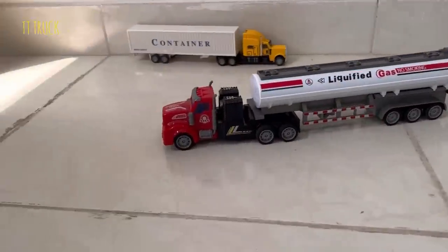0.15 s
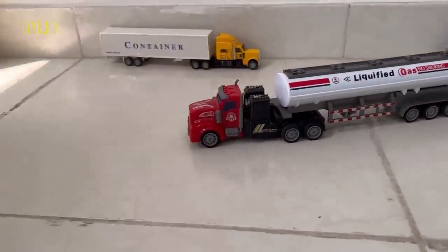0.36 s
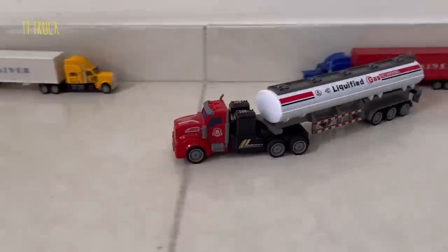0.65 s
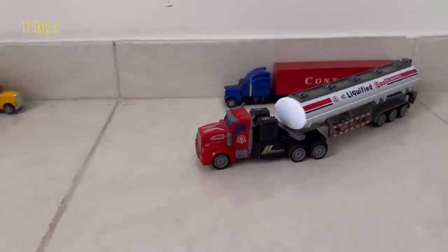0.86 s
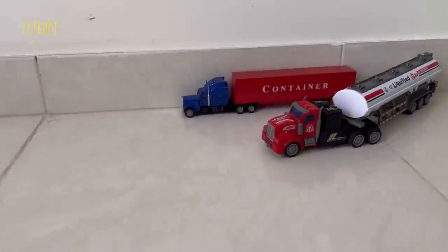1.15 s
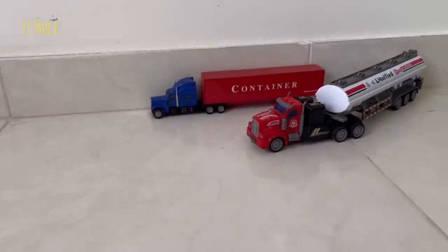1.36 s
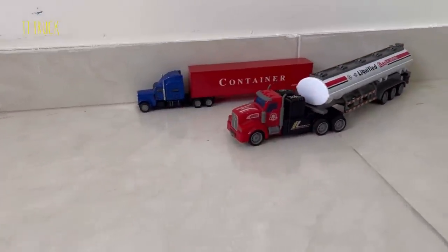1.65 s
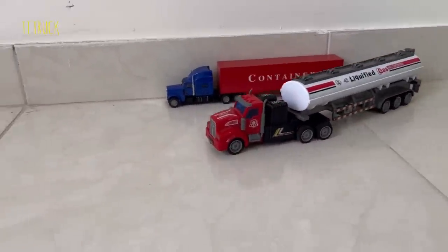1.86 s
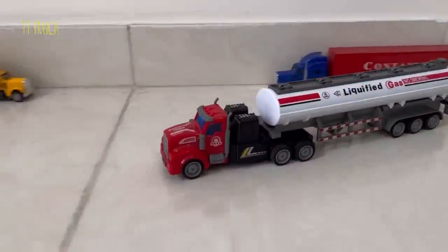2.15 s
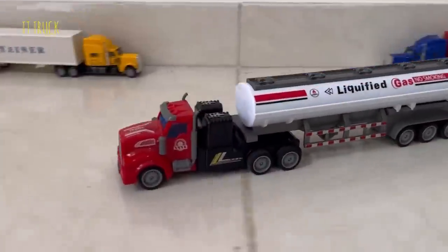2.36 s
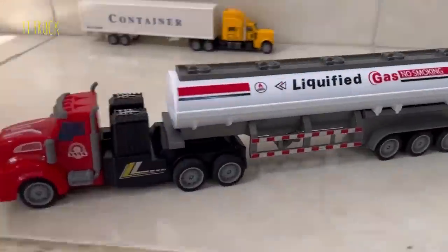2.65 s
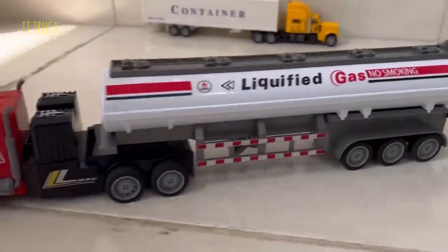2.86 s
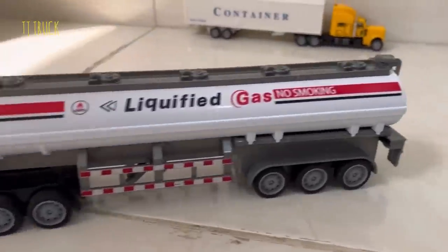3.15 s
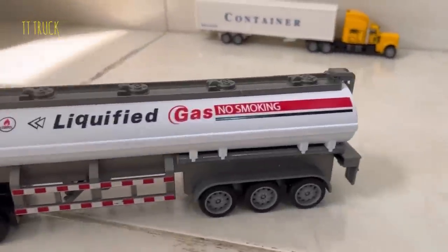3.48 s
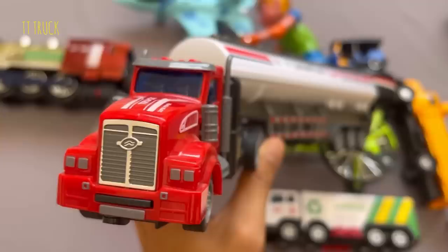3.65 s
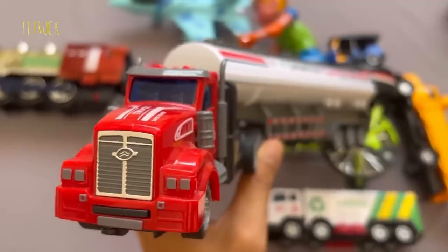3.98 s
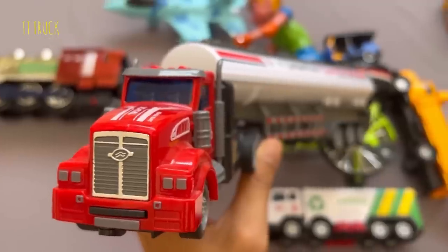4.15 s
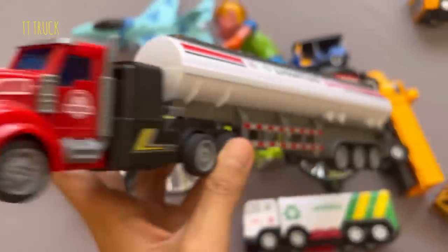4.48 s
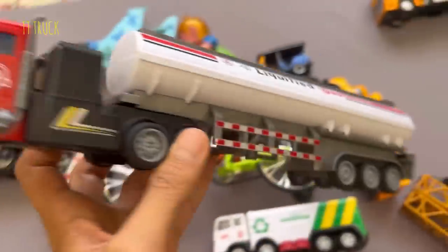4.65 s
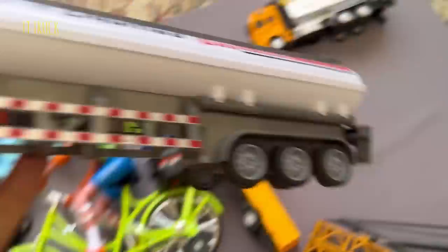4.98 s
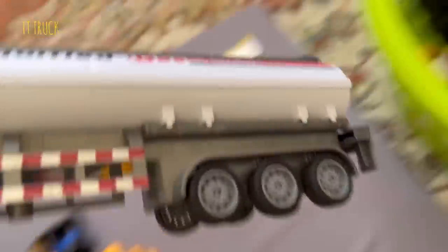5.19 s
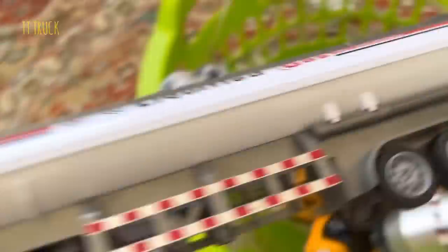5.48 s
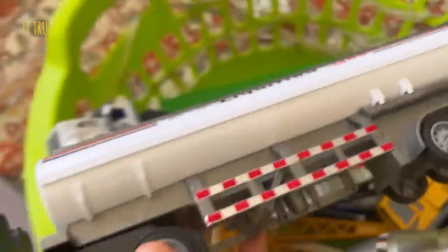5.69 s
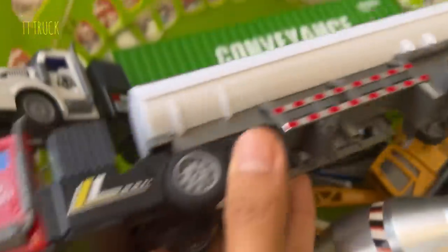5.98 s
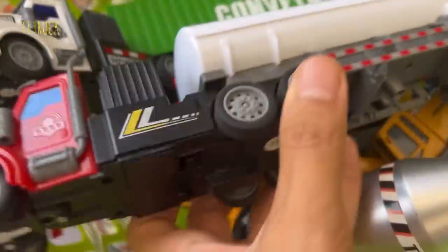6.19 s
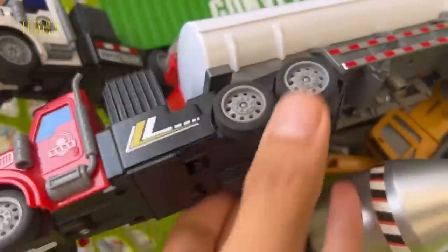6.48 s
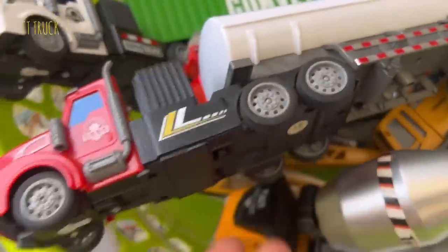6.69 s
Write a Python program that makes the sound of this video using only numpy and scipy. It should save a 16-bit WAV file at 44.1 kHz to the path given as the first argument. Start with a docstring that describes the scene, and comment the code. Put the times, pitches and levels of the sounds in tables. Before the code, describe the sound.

Plastic toy truck wheels roll and rattle back and forth over tiles, then the toy clicks and creaks as a hand turns it.

```python
"""Plastic wheels grind over tiles as a toy lorry rolls back and forth: its hollow tank rattles over the joints,
its gears rasp, and they whine as it speeds up. Then the scene changes: the toy is turned in a hand and ticks,
creaks and snaps. Contact forces excite the resonances of tank, chassis and thin edges. A small hard room
reverberates over a faint rumble, with a hum during the rolling; two microphone ports receive the toy at
different phases."""
import sys
import numpy as np
from scipy import signal
from scipy.fft import rfft, irfft, next_fast_len
from scipy.io import wavfile
from scipy.ndimage import map_coordinates

SR = 44100
rng = np.random.default_rng(int(sys.argv[2]) if len(sys.argv) > 2 else 0)


def dump(signal):
    """Clip the signal to [-1, 1] and save it as 16-bit WAV at the path in sys.argv[1]."""
    limited = np.clip(np.atleast_2d(signal).T, -1, 1)
    pcm = np.round(limited * 32767).astype(np.int16)
    wavfile.write(sys.argv[1], SR, pcm)


N = 301181
FLOOR_END_S, HAND_START_S = 3.645, 3.672

# Wheels roll back and forth; a hand rubs faintly on the plastic; later a thumb spins a wheel.
# Each row: time in seconds, rumble in dB, hiss over rumble in dB.
ROLLING = [
    [(0.0, -47, -30), (0.062, -60.5, -21.5), (0.1, -58, -17), (0.15, -50, -10), (0.26, -44, -10.5),
     (0.72, -36, -7), (0.78, -29.5, -8), (1.03, -32, -7.5), (1.09, -33.5, -7), (1.17, -33, -12),
     (1.22, -38.5, -8.5), (1.3, -52, -14), (1.5, -76, -7.5)],
    [(1.6, -55, -17), (1.73, -49.5, -10), (2.03, -41, -7), (2.28, -40.5, -5), (2.46, -37, -6),
     (2.98, -43.5, -8.5), (3.16, -51.5, -8), (3.22, -53.5, -9), (3.42, -72.5, -7), (3.6, -76.5, -7)],
    [(3.7, -70, -12.5), (3.85, -72, -11.5), (4.0, -81.5, -3.5), (4.15, -77.5, -0.5), (5.97, -80, -4),
     (6.06, -54.5, -5), (6.14, -60, -5), (6.2, -40.5, -19), (6.3, -41, -6.5), (6.4, -65.5, -7),
     (6.47, -64, -8), (6.6, -81.5, -3)],
]
# Broad radiation spectrum of the chassis. Each row: frequency in Hz, level in dB.
CHASSIS_SPECTRUM = [(1000, -43), (2200, -3), (2700, -7.5), (3300, -4), (4000, -2), (5300, -3.5), (6300, -6),
                    (7600, -5.5), (9000, -9), (14000, -51)]


def amp(db):
    return 10 ** (np.asarray(db) / 20)


def unit(x):
    return x / np.sqrt(np.mean(x ** 2) + 1e-20)


def along(points, hz):
    """Interpolation of (Hz, value) points on a logarithmic frequency axis."""
    f, v = np.transpose(points)
    return np.interp(np.log(hz + 1), np.log(f + 1), v)


def curves(rows):
    """Linear interpolation, sample by sample, of each column after the time."""
    s, *cols = np.transpose(rows)
    return [np.interp(np.arange(N) / SR, s, c) for c in cols]


def wobble(rate):
    """Smooth random modulation with rate knots a second."""
    return map_coordinates(rng.standard_normal(int(N * rate / SR) + 4), [np.arange(N) * rate / SR])


def filtered(x, response):
    """Linear filtering by a complex frequency response."""
    m = next_fast_len(N + SR // 2)
    return irfft(rfft(x, m) * response(np.fft.rfftfreq(m, 1 / SR)), m)[..., :N]


def resonator(x, hz, width):
    """A second-order resonance with unit gain at its centre."""
    return signal.lfilter(*signal.iirpeak(min(hz, SR / 3), hz / width, SR), x)


def impulse_response(spectrum, modes=(), lift_db=0):
    """Minimum-phase response of unit energy: resonance peaks on a broad spectrum."""
    hz = np.fft.rfftfreq(4096, 1 / SR)
    peaks = sum(amp(db + lift_db) / np.sqrt(1 + (2 * (hz - c) / w) ** 2) for c, w, db in modes)
    cepstrum = irfft(np.log(amp(along(spectrum, hz)) * (1 + peaks) + 1e-6))
    cepstrum[1:2048] *= 2
    cepstrum[2049:] = 0
    response = irfft(np.exp(rfft(cepstrum)))[:2048]
    return response / np.linalg.norm(response)


def radiate(forces):
    """Forced vibration: tank, chassis and thin edges each filter the force acting on them."""
    # Broad radiation spectra. Each row: frequency in Hz, level in dB.
    tank_spectrum = [(150, -35), (300, -8.5), (450, -8.5), (700, -4), (1000, -5), (1600, -3.5), (2500, -6),
                     (3300, -11.5), (4500, -24), (9000, -55.5)]
    edge_spectrum = [(4000, -36), (7500, -3.5), (10000, -4), (11500, 7.5), (14200, -2), (15300, -5),
                     (16600, -13.5)]
    # Resonances. Each row: frequency in Hz, bandwidth in Hz, relative height in dB.
    tank_modes = [(440, 70, -2.5), (652, 110, 3), (903, 110, 4), (1090, 83, -2.5), (1387, 85, 3.5),
                  (2320, 180, -9)]
    chassis_modes = [(4674, 200, -3.5), (2920, 210, -4.5), (8740, 600, -5)]
    parts = (impulse_response(tank_spectrum, tank_modes, lift_db=-6.5),
             impulse_response(CHASSIS_SPECTRUM, chassis_modes),
             impulse_response(edge_spectrum))
    return sum(signal.fftconvolve(force, part)[:N] for force, part in zip(forces, parts))


def grit(rate, spread_db, smooth):
    """Shot noise: random contacts of uneven size on a bed of white noise."""
    hit = rng.random(N) < rate / SR
    sizes = amp(spread_db * np.minimum(rng.exponential(size=N), 3.5)) * rng.standard_normal(N)
    return unit(unit(hit * sizes) + smooth * rng.standard_normal(N))


def rim_pressure(per_turn=1):
    """Periodic loading: an uneven wheel's pressure swings from -1 to 1 as the toy coasts out."""
    # Each entry: time in seconds of the pressure drop that comes once a turn.
    lifts = [2.64, 2.68, 2.72, 2.762, 2.817, 2.88, 2.935, 3.007, 3.068, 3.14, 3.195, 3.245, 3.3]
    t = np.arange(N) / SR
    turns = np.interp(t, lifts, np.arange(len(lifts)))
    return -np.cos(2 * np.pi * per_turn * turns) * (t > lifts[0]) * (t < lifts[-1])


def wheels_and_rubbing():
    """Roughness excitation: wheels cross grit or a hand rubs the plastic; all three forces throb alike."""
    rumble_db, hiss_db = curves(np.vstack(ROLLING))
    throb = amp(rumble_db + 2.8 * rim_pressure() + 1.7 * wobble(50) + 1.3 * wobble(13))
    contact = [grit(rate=2500, spread_db=0.5, smooth=0.3) for _ in range(3)]
    return throb * contact * amp(np.outer([0, 1, 2.2], hiss_db))


def air(spectrum):
    """Partly coherent stereo noise of unit rms, nearly mono in the bass."""
    # Each row: frequency in Hz, correlation of left and right.
    correlation = [(60, 0.93), (180, 0.91), (550, 0.71), (1650, 0.2), (4970, 0.61), (7500, .3), (9500, -.7),
                   (15000, -.3)]

    def mid_and_side(hz):
        angle = np.arccos(np.clip(along(correlation, hz), -1, 1)) / 2
        return amp(along(spectrum, hz)) * [np.cos(angle), np.sin(angle)]

    mid, side = filtered(rng.standard_normal((2, N)), mid_and_side)
    return unit(np.array([mid + side, mid - side]))


def hum():
    """Amplitude and phase modulation make the low tones of a distant machine waver."""
    # Each row: frequency in Hz, level in dB, rate of wavering in Hz.
    tones = [(115.6, -49.5, 5.4), (76, -60, 10)]
    t = np.arange(N) / SR
    return sum(amp(db + 1.2 * wobble(rate)) * np.sin(2 * np.pi * hz * t + 1.4 * wobble(rate))
               for hz, db, rate in tones)


def background():
    """Ambient noise: one spectrum with hum for the floor, another for the hand."""
    # Each row: frequency in Hz, relative spectral density in dB.
    floor_spectrum = [(24, -32), (40, -4.5), (118, -7), (140, -7.5), (215, -14), (363, -20.5), (770, -30.5),
                      (1040, -52.5), (1810, -40), (3300, -60.5), (6650, -53), (9450, -79.5), (16000, -62.5)]
    hand_spectrum = [(24, -49), (40, -2), (77, 1), (99, -11), (130, -1.5), (159, -12), (194, -9),
                     (220, -18), (329, -18), (542, -29.5), (1040, -34.5), (1590, -37.5), (2300, -52),
                     (3300, -39.5), (5800, -57), (6800, -56), (7500, -45), (8400, -70), (16000, -67.5)]
    t = np.arange(N) / SR
    fade_out = np.clip((FLOOR_END_S - t) / 0.004, 0, 1)
    fade_in = np.clip((t - HAND_START_S) / 0.013, 0, 1)
    floor = amp(-51) * air(floor_spectrum) + hum()
    hand = amp(-53.5) * air(hand_spectrum)
    return fade_out * floor + fade_in * hand


def knocks(rows, decay_ms, rise, faster, focus):
    """Impact excitation: each knock is a decaying burst of force on tank, chassis and thin edges."""
    forces, t = np.zeros((3, N + SR)), np.arange(SR // 10) / SR
    decay_s = decay_ms / 1000 / faster ** np.arange(3)[:, None]
    shape = np.exp(-t / decay_s) * (1 - np.exp(-t / (rise * decay_s)))
    for s, db, body_hz, bright_db, fizz_db in rows:
        burst = shape * rng.standard_normal((3, len(t)))
        struck = int(body_hz > 3500)  # high knocks ring the chassis, the others the tank
        ring = resonator(burst[struck], body_hz, 0.16 * body_hz)
        burst[struck] += focus * ring * np.linalg.norm(burst[struck]) / np.linalg.norm(ring)
        burst /= np.sqrt(np.sum(burst ** 2, 1) / np.sum(shape ** 2, 1))[:, None]
        levels = db + np.array([[0], [bright_db], [fizz_db]])
        forces[:, round(s * SR):][:, :len(t)] += amp(levels) * burst
    return forces[:, :N]


def rattles(count=70):
    """Random impacts of the tank, as rows for jolts; their strength follows the rumble."""
    s = rng.random(count) * FLOOR_END_S
    level, pitch, brightness = rng.standard_normal((count, 3)).T
    when, rumble_db, _ = np.vstack(ROLLING).T
    db = np.interp(s, when, rumble_db) + 10.5 + 3.5 * level
    return np.transpose([s, db, 1050 * np.exp(0.2 * pitch), -11.5 + 1.5 * brightness])


def jolts():
    """Impacts at tile joints and in the hand: the brighter one is, the more the thin edges fizz."""
    # Each row: start in seconds, force level in dB, pitch in Hz, chassis over tank in dB.
    hard_jolts = [(0.002, -31.5, 720, -24), (0.019, -36, 710, -32.5), (0.224, -29.5, 1160, -6),
                  (0.254, -29.5, 680, -19.5), (0.492, -27, 1314, -5.5), (0.513, -26, 835.4, 1),
                  (0.546, -11.5, 676, -7.5), (0.651, -19.5, 921, -6.5), (0.758, -3.5, 516, -6.5),
                  (0.766, -1, 570.5, -9), (0.782, -12.5, 788, 4.5), (0.787, -6.5, 940, -12),
                  (0.807, -1, 1425, -7), (0.821, -11.5, 1362, -3.5), (0.832, -17, 1297, -8),
                  (0.862, -12.5, 945.6, -2.5), (0.895, -9.5, 1106, -5), (0.899, -4, 933, -6),
                  (0.91, -6, 1333, -8.5), (0.925, -6.5, 834, -6), (0.94, -12, 994, -8),
                  (0.947, -9, 1416, -0.5), (0.981, -18, 898, -9), (1.011, -15, 911, -9),
                  (1.038, -14, 1524, 3), (1.044, -14.5, 744, -7.5), (1.055, -15.5, 597, -5),
                  (1.072, -16.5, 973, -10), (1.153, -18, 903, -12), (1.162, -16, 802.5, -15.5),
                  (1.188, -19.5, 2323, -15.5), (1.262, -25, 1067, -19.5), (1.556, -32.5, 2047, 1),
                  (1.989, -25.5, 1235, -8.5), (2.089, -37.5, 1460, 5), (2.174, -27, 1540, -2),
                  (2.238, -22.5, 875, -8.5), (2.274, -20.5, 755, -4), (2.281, -23, 905.5, -12.5),
                  (2.316, -18, 1037, -33), (2.334, -15.5, 1399, -7.5), (2.352, -16.5, 1267, -32),
                  (2.381, -20.5, 1210, -12), (2.426, -18, 1427, -7.5), (2.491, -22, 681, -22),
                  (2.552, -19.5, 848, -13.5), (2.563, -17.5, 1485, -13), (2.582, -13.5, 1438, -9.5),
                  (2.619, -20.5, 1069, -9), (2.689, -25.5, 1500, -0.5), (2.78, -29.5, 1200, -5),
                  (3.048, -30.5, 625, -10.5), (3.257, -40.5, 1375, -5), (4.184, -39, 1400, 4),
                  (4.804, -45, 614.7, -17), (5.538, -46, 617, -13), (6.024, -27, 1397, -9.5),
                  (6.034, -15.5, 1740, -2), (6.038, -11.5, 1500, -3.5), (6.042, -16, 868, -20.5),
                  (6.157, -17.5, 865, -13.5), (6.21, -27, 766, -2.5), (6.261, -20.5, 919, -16.5),
                  (6.274, -19, 616, -19)]
    rows = np.vstack([hard_jolts, rattles()])
    fizz_db = rows[:, 3] - 6.5
    return knocks(np.column_stack([rows, fizz_db]), decay_ms=3.04, rise=0.59, faster=1.06, focus=0.22)


def gear_rasp():
    """Gear rattle excites the modes of the case; as the gears slow, single ticks stand out."""
    # A slack gear. Each row: time in seconds, ticks per second, their share of the chatter from 0 to 1.
    ticking = [(0, 32, 0.2), (1.7, 36, 0.2), (2.3, 41, 0.2), (2.75, 175, 0.7), (3.09, 160, 0.85),
               (3.16, 95, 0.9), (3.22, 110, .9), (3.27, 56, .9), (3.4, 40, 0.9)]
    # Modes of the case. Each row: frequency in Hz, bandwidth in Hz.
    case_modes = [(4250, 600), (5050, 380)]
    # Each row: time in seconds, level over the rumble in dB, upper mode over lower in dB.
    balance = [(0.09, -33, -4), (0.15, -8, -8.5), (1.2, -32.5, -5), (1.72, -12, 5), (1.93, -6, 1.5),
               (2.25, -7, 4), (2.45, -37, 11), (2.68, -14.5, -4), (2.85, -10.5, -7), (3.05, -11.5, -10),
               (3.17, -8, -12), (3.2, -15.5, -11), (3.28, -7, -12), (3.45, -24.5, -8), (3.6, -90, -3)]
    rate, share = curves(ticking)
    passed = np.floor(np.cumsum(rate * (1 + 0.06 * wobble(18))) / SR)
    ticks = np.diff(passed, prepend=0) * np.sqrt(SR / rate) * amp(1.5 * rng.standard_normal(N))
    pressure = amp(4 * rim_pressure() + 4 * rim_pressure(per_turn=2) + 1.5 * wobble(40))
    ticks *= pressure * share
    chatter = ticks + pressure * (1 - share) * grit(rate=2100, spread_db=2, smooth=0.4)
    lower, upper = [unit(resonator(resonator(chatter, hz, 1.5 * width), hz, 1.5 * width))
                    for hz, width in case_modes]
    snap = signal.fftconvolve(ticks, impulse_response(CHASSIS_SPECTRUM))[:N]
    tank_knock = unit(resonator(ticks, hz=2450, width=600)) * share
    over_db, tilt_db = curves(balance)
    rumble_db = curves(np.vstack(ROLLING))[0]
    case = amp(-tilt_db / 2) * lower + amp(tilt_db / 2) * upper
    return amp(rumble_db + over_db) * (case + amp(-9.5) * snap + amp(-0.5) * tank_knock)


def thuds():
    """Heavily damped oscillation: a bump gives a few low cycles."""
    # Each row: start in seconds, relative level in dB, frequency in Hz.
    bumps = [(0.55, -34.5, 199.8), (0.771, -21, 415), (0.788, -24.5, 466), (0.814, -17, 440),
             (0.91, -16, 444), (0.93, -18.5, 479), (0.901, -35.5, 202.2), (2.335, -35, 211),
             (2.409, -35.5, 168), (2.552, -40.5, 195.1), (2.587, -43, 170), (4.469, -46, 205),
             (5.08, -54, 355), (6.037, -34.5, 206), (6.16, -41.5, 238.5), (6.259, -38.5, 81),
             (6.275, -37, 160)]
    out, t = np.zeros(N + SR), np.arange(SR // 10) / SR
    for s, db, hz in bumps:
        out[round(s * SR):][:len(t)] += amp(db) * np.sin(2 * np.pi * hz * t) * np.exp(-hz * t / 2.4)
    return out[:N]


def snaps():
    """A single hard contact is nearly an impulse, so its spectrum is broad."""
    # Each row: start in seconds, force level in dB, pitch in Hz, chassis and edges over tank in dB.
    contacts = [(0.7665, -6, 900, -6, -16.5), (0.7875, -7, 900, -6.5, -16), (0.862, -12.5, 1000, -2, -12.5),
                (1.5863, -25.5, 890, 11, 25), (1.6614, -36.5, 909, 9, 14.5), (1.7047, -36.5, 870, 8, 14),
                (2.337, -18.5, 1400, -8, -13), (2.392, -15.5, 3930, 2.5, -4), (2.412, -8, 2400, -5, -9),
                (2.584, -17, 1440, -2, -13.5)]
    return knocks(contacts, decay_ms=0.35, rise=0.13, faster=2.1, focus=0.44)


def pings(rise_ms=0.37):
    """Free vibration: a small hollow part, once struck, rings with one short clear note."""
    # Each row: start in seconds, level in dB, frequency in Hz, time to fall 60 dB in seconds.
    notes = [(0.809, -16, 1407, 0.033), (0.862, -17, 3000, 0.017), (0.909, -16, 4548, 0.034),
             (1.542, -25.5, 5860, .014), (1.555, -34, 3275, .03), (1.588, -29.5, 2310, .02),
             (4.185, -45.5, 3870, 0.023), (4.436, -26.5, 2073, 0.035), (4.44, -32, 1350, 0.036),
             (4.453, -44.5, 1702, 0.044), (5.243, -45, 2120, .02), (6.037, -16, 3002, .015),
             (6.042, -19, 856, 0.036), (6.2482, -6, 3000, 0.0099), (6.2488, -5.5, 4707, .014)]
    out, t = np.zeros(N + SR), np.arange(SR // 10) / SR
    swell = 1 - np.exp(-1000 * t / rise_ms)
    for s, db, hz, t60 in notes:
        tone = np.sin(2 * np.pi * hz * t + rng.uniform(0, 2 * np.pi))
        out[round(s * SR):][:len(t)] += amp(db - 60 * t / t60) * swell * tone
    return out[:N]


def creaks():
    """Soft pushes build force more slowly and drive a resonance of the plastic."""
    # Each row: start in seconds, force level in dB, pitch in Hz, chassis and edges over tank in dB.
    pushes = [(1.105, -22, 2280, -17, -25), (1.175, -21.5, 2300, -7, -12),
              (1.203, -22.5, 2345, -14.5, -25.5), (4.186, -45, 2120, -7, -22), (4.237, -51, 1003, -5, -20),
              (4.64, -51.5, 1400, -9, -31), (4.652, -48, 1390, -17, -30.5), (5.002, -45, 719, -14, -30.5),
              (5.012, -61, 1350, -20, -30), (5.768, -51, 1097, -22, -29), (5.824, -38, 682, -23, -18.5),
              (6.437, -46, 1103, -12, -26), (6.262, -31, 920, 8, -15.5)]
    return knocks(pushes, decay_ms=6.7, rise=0.69, faster=0.99, focus=0.63)


def clicks():
    """Brief impacts of loose plastic parts, whose treble dies first."""
    # Each row: start in seconds, force level in dB, pitch in Hz, chassis and edges over tank in dB.
    contacts = [(1.497, -48, 1967, -8, -24.5), (1.542, -27, 835, 7, 0.5), (1.681, -35.5, 2260, -14, -11.5),
                (2.548, -17, 1040, -7.5, -12), (4.29, -53.5, 2300, -4, -25),
                (4.348, -54.5, 1380, -23, -25.5), (4.435, -28.5, 2070, 2.5, -4.5),
                (4.439, -29.5, 2000, -10, -20), (4.39, -62, 2500, -4.5, -15), (4.445, -30, 1720, -10, -19),
                (4.454, -33.5, 1700, -1, -26), (4.695, -65.5, 4800, 8.5, -14.5),
                (4.745, -41.5, 1810, -11, -30), (4.769, -44, 602, -8, -29),
                (4.998, -39.5, 1295, -13.5, -25), (5.243, -41, 2120, -4.5, -14),
                (5.285, -56, 500, -28, -23), (5.791, -31.5, 1080, -16, -36), (5.796, -30, 1030, -16.5, -35),
                (5.84, -39.5, 1110, -23, -29.5), (5.845, -42, 1010, 9, -1), (5.981, -45, 599, 9, -5),
                (5.998, -44.5, 700, -8.5, -18), (6.017, -26, 1474, 4, -5), (6.151, -31, 1027, -8, -20),
                (6.189, -36.5, 1110, 5.5, -7), (6.222, -33, 900, -9, -7.5), (6.233, -28, 813, -11.5, -19),
                (6.24, -27.5, 796.5, -11, -24), (6.2485, -12.5, 2930, -2, 3), (6.252, -18.5, 963, 0.5, -9),
                (6.412, -44, 1852, 5.5, -19), (6.431, -30, 1110, -3.5, -26.5),
                (6.444, -38.5, 1300, -2, -19.5), (6.498, -50, 1070, -12.5, -25),
                (6.557, -55.5, 520, 4.5, 2.5), (6.73, -55, 1518, -19.5, -32)]
    return knocks(contacts, decay_ms=1.45, rise=0.13, faster=1.5, focus=0.32)


def gear_whine(start_hz=450, limit_hz=1300, climb_s=0.75):
    """Meshing teeth sound harmonics of the tooth-passing frequency, which climbs with the speed."""
    # Each row: harmonic number, relative level in dB.
    harmonics = [(1, -20), (2, -5.5), (3, -10), (4, -18)]
    start_s, loudest_s, stop_s = 1.8, 1.9, 2.3
    t = np.arange(N) / SR
    hz = limit_hz - (limit_hz - start_hz) * np.exp(-np.maximum(t - start_s, 0) / climb_s)
    db = np.interp(t, [start_s - 0.15, start_s, loudest_s, stop_s, stop_s + 0.15],
                   [-150, -46, -41, -44, -150])
    phase = 2 * np.pi * np.cumsum(hz * (1 + 0.008 * wobble(50))) / SR
    return sum(amp(db + level + 4 * wobble(30)) * np.sin(k * phase) for k, level in harmonics)


def room(x, early_db):
    """Early reflections and a reverberant tail; both keep changing because the toy moves."""
    # Each row: frequency in Hz, reverberation time in seconds, strength with the toy on the floor
    # and in the hand in dB, ratio of side to mid signal.
    walls = np.array([(196.5, 0.41, -9.5, 2, .1), (815, 0.34, -2, -6, 0.64), (2040, 0.21, -4.5, -4.5, 0.75),
                      (6096, 0.17, -5.5, -3, 1), (13900, 0.15, -15.5, -10, 0.9)])
    wet, step = np.zeros((2, N + SR)), SR // 12
    hz, t, _ = signal.stft(np.zeros(SR // 3), SR, nperseg=256)
    t60, floor_db, hand_db, width = [along(walls[:, [0, c]], hz)[:, None] for c in range(1, 5)]
    decay = amp(-60 * t / t60) + amp(early_db - 60 * t / 0.02)
    decay /= np.linalg.norm(decay, axis=1, keepdims=True)
    for start in range(0, N, step):
        mid, side = signal.stft(rng.standard_normal((2, SR // 3)), SR, nperseg=256)[2]
        level = decay * amp(floor_db if start < FLOOR_END_S * SR else hand_db) / np.sqrt(128)
        tail = signal.istft(level * [mid + width * side, mid - width * side], SR, nperseg=256)[1]
        echo = signal.fftconvolve(x[None, start:start + step], tail, axes=1)
        wet[:, start + 60:][:, :echo.shape[1]] += echo
    return wet[:, :N]


def ports(hz):
    """Level and phase differences between two microphone ports give the stereo image."""
    # Each row: frequency in Hz, left over right in dB.
    level_difference = [(300, 0.6), (1500, 2.5), (5000, 2), (14000, -0.5)]
    # Each row: frequency in Hz, lead of the left in radians.
    phase_lead = [(0, 0), (1720, -0.4), (2760, 0.4), (4740, 0.5), (5860, -0.4), (7580, -0.1), (9040, -2.7),
                  (10800, -3.2), (12600, -6.2), (14300, -6.3), (15600, -9.2), (16500, -9.3)]
    half = np.array([[0.5], [-0.5]])
    gain = amp(half * along(level_difference, hz))
    return gain * np.exp(1j * half * np.interp(hz, *np.transpose(phase_lead)))


def scene():
    """Superposition of direct sound, reverberation and background, with a gap between floor and hand."""
    forces = wheels_and_rubbing() + jolts() + clicks() + snaps() + creaks()
    toy = radiate(forces) + gear_rasp() + thuds()
    tones = gear_whine() + pings()
    direct = amp(-2.5) * toy + tones
    reverberation = room(toy + amp(-8) * tones, early_db=4.5)  # tones reach the walls more weakly
    t = np.arange(N) / SR
    audible = (t < FLOOR_END_S) | (t > HAND_START_S)
    return filtered(direct + reverberation, ports) * audible + background()


def record(dry):
    """Soft saturation rounds the loudest peaks; a low-pass filter limits the band."""
    return filtered(np.tanh(dry), lambda hz: hz < 16700)


dry = scene()
out = record(dry)
dump(out)
```